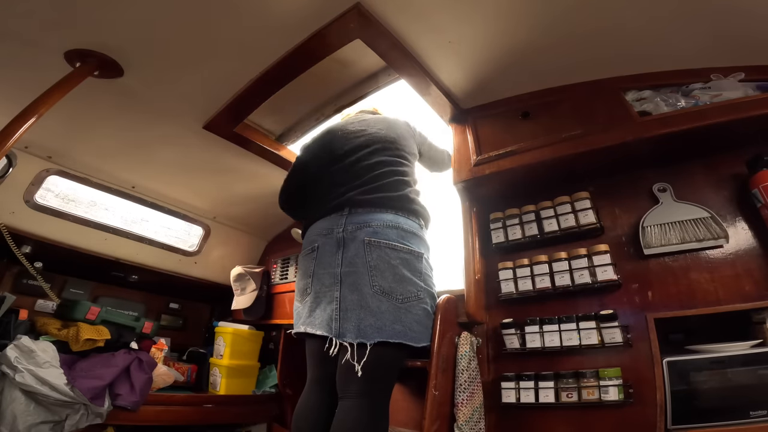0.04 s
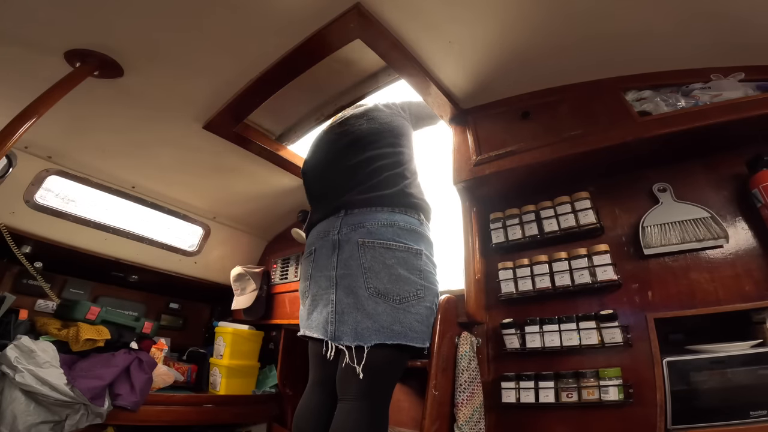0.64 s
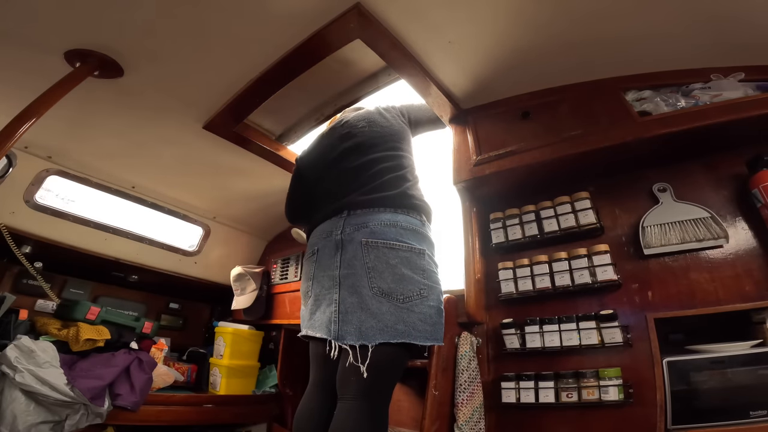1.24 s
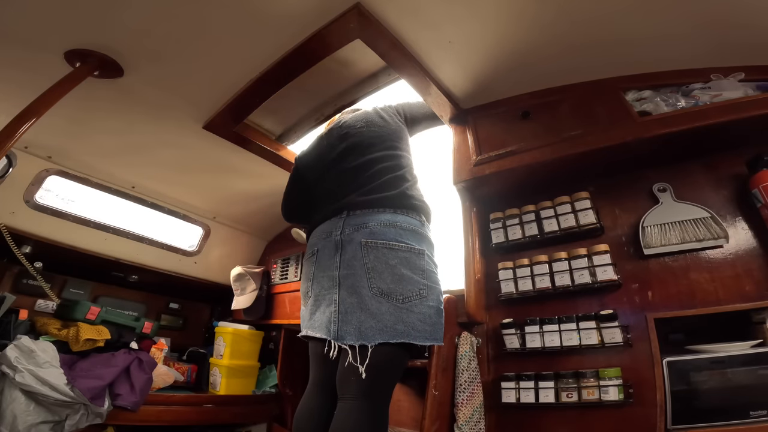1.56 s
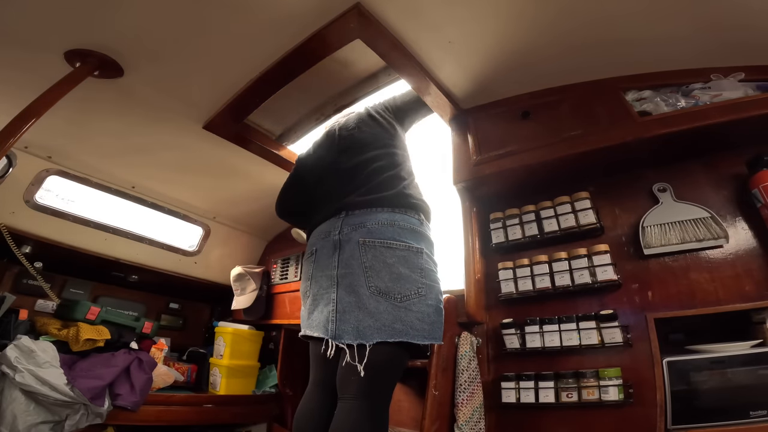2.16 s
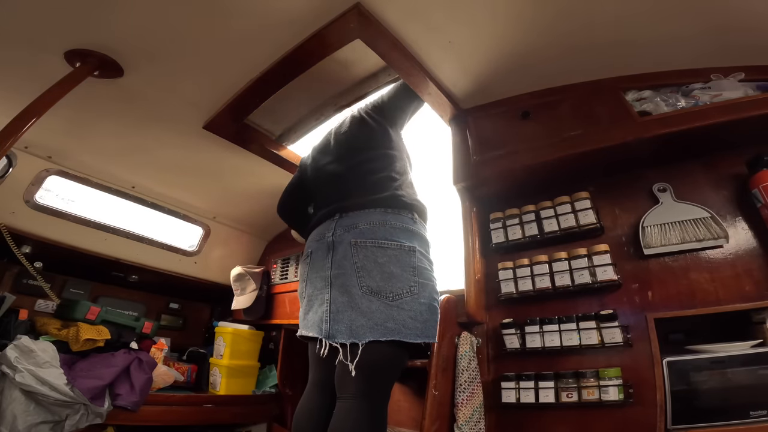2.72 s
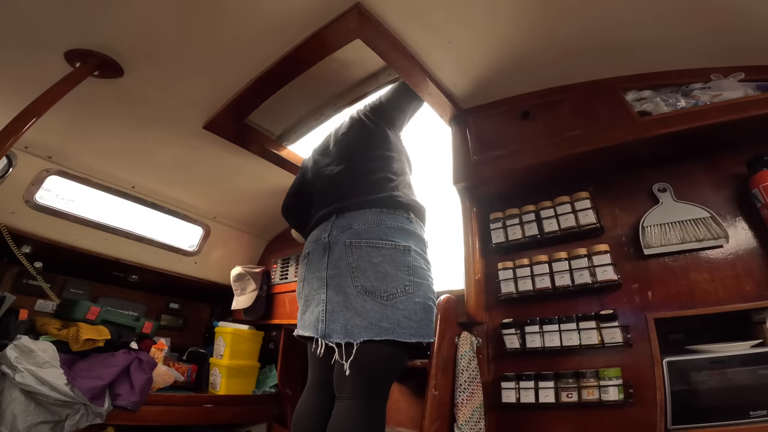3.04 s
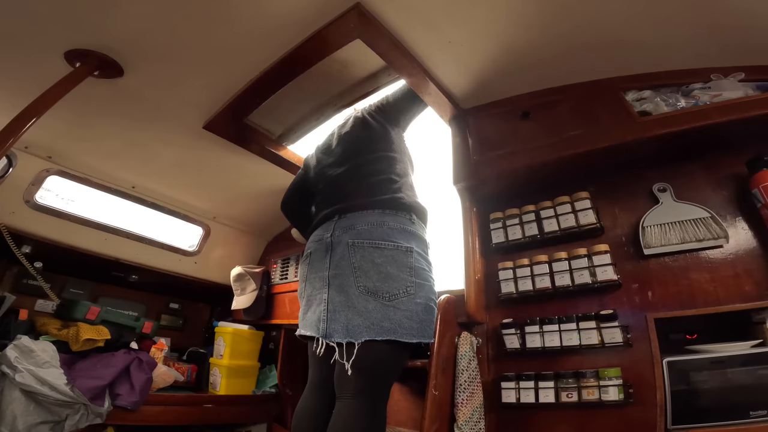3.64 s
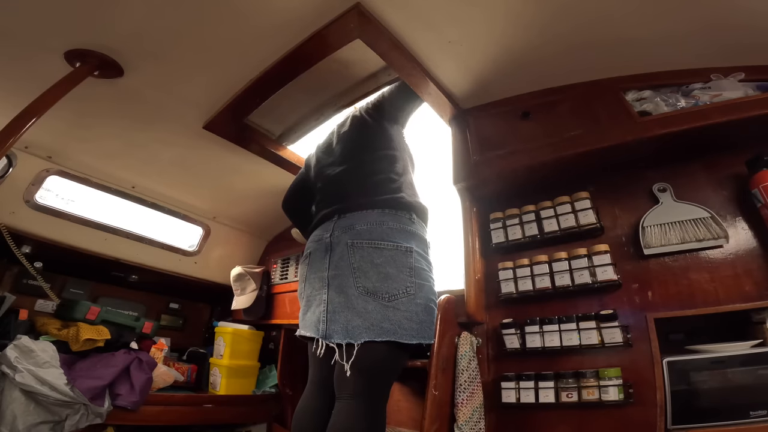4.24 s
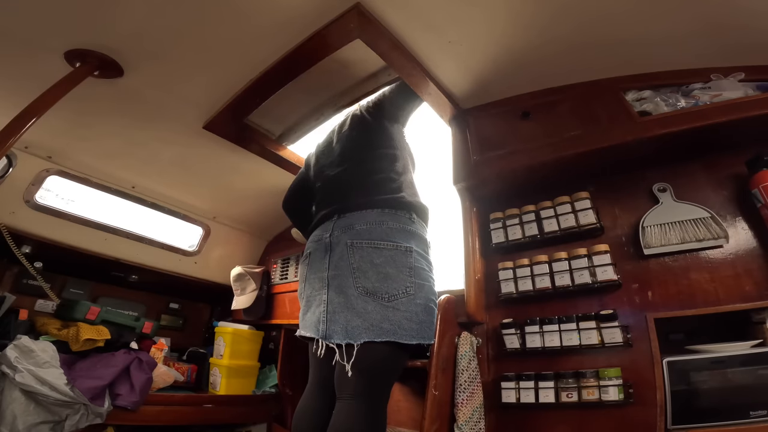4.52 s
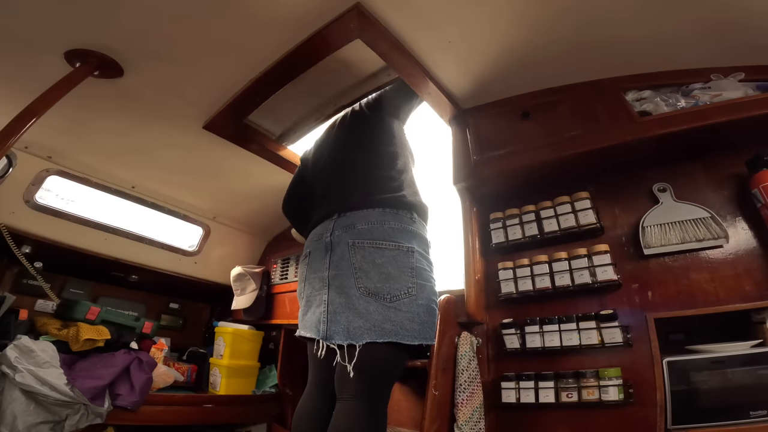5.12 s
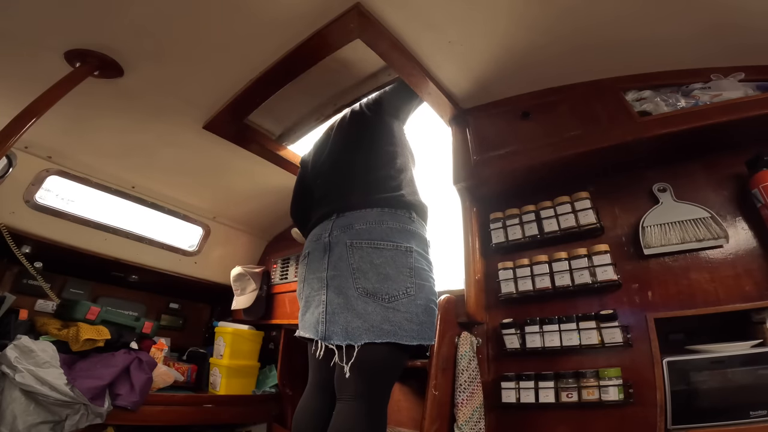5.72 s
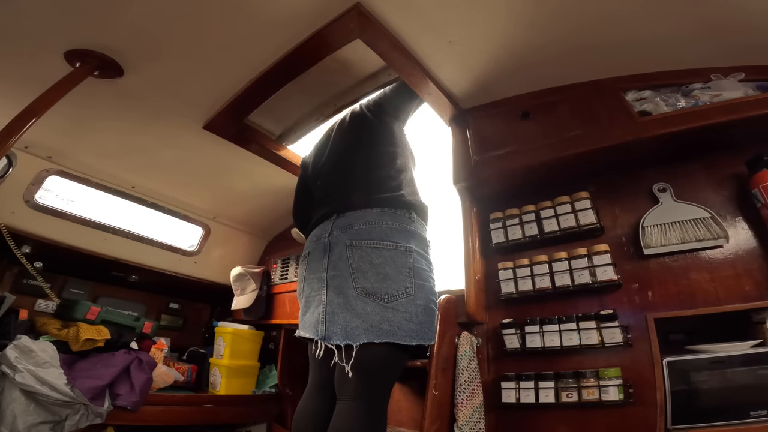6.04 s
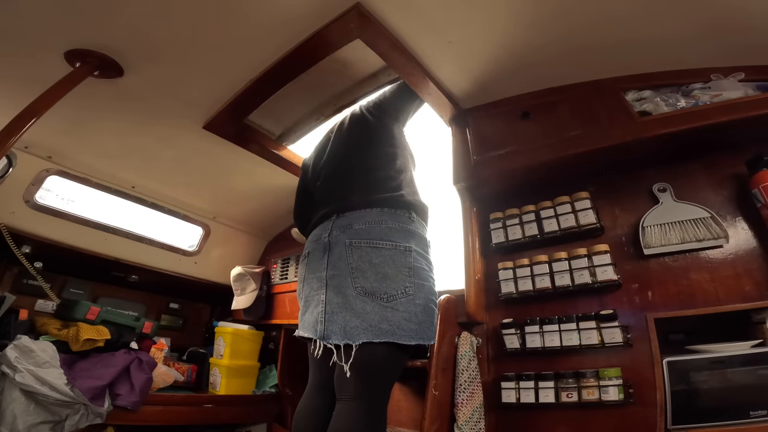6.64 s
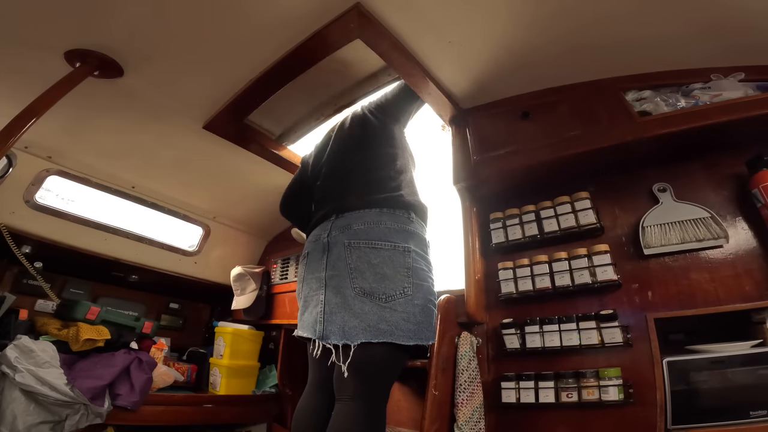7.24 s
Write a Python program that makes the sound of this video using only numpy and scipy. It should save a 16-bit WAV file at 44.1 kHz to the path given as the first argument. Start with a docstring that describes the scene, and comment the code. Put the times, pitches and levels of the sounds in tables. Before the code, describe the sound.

Hands knock, shove and scrape at a metal hatch frame in a small wooden boat cabin, with hollow clunks and rubbing.

```python
"""Someone works at the metal hatch frame of a small wooden boat, palms and sleeves swishing throughout.
An early knock booms through deck and hull; light scrapes follow, and a palm groans on the varnish.
Near three seconds the hatch is shoved three times and judders. Then come firm knocks, ticks and the
sharpest scrapes along the metal, while the hull rumbles more under the shifting weight.
A faint squeak leads into one last hard knock just before seven seconds."""
import sys
import numpy as np
from scipy import signal
from scipy.fft import rfft, irfft, next_fast_len
from scipy.io import wavfile

SR = 44100
rng = np.random.default_rng(int(sys.argv[2]) if len(sys.argv) > 2 else 0)


def waveform_to_disk(signal):
    """Save audio, clipped to [-1, 1], as 16-bit WAV at the path in sys.argv[1]."""
    frames = np.transpose(np.atleast_2d(signal))
    scaled = np.clip(frames, -1, 1) * 32767
    samples = np.round(scaled).astype(np.int16)
    wavfile.write(sys.argv[1], SR, samples)


N = 321048
TIME = np.arange(N) / SR

# rasp of the metal frame: freq_hz, level_db
RASP_SPECTRUM = [(400, -4), (900, -8.5), (1400, 5), (2000, 1.5), (2700, 2.5), (3500, 0.5), (5000, -2.5),
                 (8000, -37), (14000, -52)]
# hiss of its fine surface grain: freq_hz, level_db
GRAIN_SPECTRUM = [(1000, -26.5), (3000, 0.5), (4600, 7), (7300, 7.5), (8800, -4), (10500, -7),
                  (12500, -17.5), (15000, -31)]


def blows():
    """Hands strike the frame: single knocks, plus an uneven run of bumps for each shove of the hatch."""
    # deck thud, hull boom, panel knock and contact clack of each blow:
    # start_s, thud_db, boom_db, panel_db, clack_db, chafe_s
    hand_knocks = [(0.03, -54.5, -78, -57, -61, 0.077), (0.381, -28.5, -23, -21.5, -26.5, 0.052),
                   (0.657, -58, -59, -58, -72, 0.081), (0.866, -43, -46, -47, -48, .17),
                   (1.074, -52.5, -73, -66, -61, .1), (1.42, -51.5, -53, -49.5, -59, 0.11),
                   (1.484, -46, -28.5, -47, -56, .16), (1.832, -54, -65, -78, -41.5, 0.026),
                   (1.937, -53, -40, -46.5, -55.5, 0.46), (2.344, -36.5, -40, -33.5, -40.5, 0.15),
                   (2.571, -48.5, -43, -49, -37.5, 0.069), (2.659, -38, -42, -57, -73, .08),
                   (2.715, -29, -24.5, -44, -56, 0.046), (2.747, -28.5, -31, -31, -53.5, 0.11),
                   (2.845, -35, -25.5, -42, -56, 0.07), (3.022, -46.5, -37, -47, -64, .09),
                   (3.176, -43, -35, -48, -61, 0.19), (3.577, -31, -32, -50, -43.5, .07),
                   (3.603, -52, -28, -28, -34.5, 0.075), (3.858, -20.5, -36.5, -27.5, -39.5, 0.25),
                   (4.025, -58, -49, -47, -46.5, 0.1), (4.284, -29, -26.5, -29.5, -39.5, 0.27),
                   (4.59, -43, -55, -38, -41.5, .05), (5.065, -41, -45, -59, -50.5, 0.13),
                   (5.297, -24.5, -33, -26.5, -28.5, 0.08), (5.557, -42.5, -44.5, -38.5, -39.5, 0.07),
                   (5.713, -46, -35.5, -34.5, -35, 0.11), (5.816, -41, -34.5, -34.5, -35.5, 0.1),
                   (5.868, -30, -46.5, -36, -44.5, 0.12), (6.061, -34.5, -34.5, -25.5, -32, 0.18),
                   (6.324, -51, -60, -46.5, -57, .05), (6.442, -44.5, -37, -63, -50.5, 0.21),
                   (6.817, -23, -21.5, -21, -25, 0.042), (7.036, -41.5, -37, -46, -58.5, 0.16),
                   (7.155, -49.5, -36, -52.5, -73, .08)]
    # the hatch judders in its frame: start_s, end_s, peak_db
    shoves = [(2.756, 2.903, -36), (3.184, 3.343, -36), (3.606, 3.704, -38)]
    bumps_per_s, arch_db, chafe_s = 38, 8, 0.074
    boom_db, panel_db, clack_db = 1.5, -4.5, -14   # relative to the bump's thud
    rows = list(hand_knocks)
    for (start, end, peak_db), jitters in zip(shoves, rng.uniform(-1, 1, (len(shoves), 32))):
        for k, jitter in enumerate(jitters):
            s = start + (k + jitter * 0.25) / bumps_per_s
            if s < end:
                thud = peak_db - arch_db * (2 * (s - start) / (end - start) - 1) ** 2   # weak at the ends
                rows.append((s, thud, thud + boom_db, thud + panel_db, thud + clack_db, chafe_s))
    return np.array(rows)


def deck(hits, uneven_db, boom_db, thud_db, panel_db, frame_db):
    """Heavy blows ring the low hull modes, hard ones panels and frame; each touch favours other modes."""
    # resonances of hull, deck, panels and frame: pitch_hz, level_db, t60_s
    modes = [(49.6, -5.5, 0.85), (65.6, -4.5, 0.42), (79.7, -9.5, 0.25), (92.2, -4, 0.54),
             (121.5, -1.5, 0.3), (153.6, -3, 0.34), (175.6, -6.5, 0.49), (190.2, -4.5, 0.37),
             (216.4, -0.5, 0.24), (232, 6, 0.13), (259.8, -2.5, 0.15), (294.2, -12.5, 0.29),
             (335.2, -4.5, 0.18), (365.4, -6.5, 0.16), (380.8, -6, 0.14), (420, -11.5, 0.12),
             (503, -27.5, 0.11), (560.3, 1, 0.14), (615, -18, 0.16), (690.4, 2, 0.11), (792, -4.5, 0.11),
             (862, -28, 0.033), (1036, 3.5, 0.097), (1215, 2.5, 0.05)]
    # a hand rolls onto the frame in several touches: lag_s, share_db
    touches = [(-.002, -9), (.003, -2.5), (.012, -3.5), (.023, -7.5)]
    jitter_s, weight_lag_s = 0.003037, 0.0031   # the hand's weight lands just after the first contact
    soft_hand_hz = 2200   # a hand passes little above this to the deck
    zones_hz = [107, 210.3, 343.7, 480]   # centres of boom, thud, panel and frame
    s, thud, boom, panel, clack, _ = hits.T
    lag_s, share_db = np.transpose(touches)
    luck = rng.standard_normal((128, 2, len(modes), len(touches)))[:len(s)]
    force_db = np.array([boom + boom_db, thud + thud_db, panel + panel_db, clack + frame_db])
    out = np.zeros(N)
    for k, (hz, db, t60) in enumerate(modes):
        zone_mix = np.array([at_hz(np.c_[zones_hz, zone], hz) for zone in np.eye(len(zones_hz))])
        times = s[:, None] + weight_lag_s * zone_mix[0] + lag_s + jitter_s * np.tanh(luck[:, 0, k])
        levels_db = (zone_mix @ force_db)[:, None] + db + share_db + uneven_db * luck[:, 1, k]
        # neighbouring modes start in opposite directions, so the clunk takes a few cycles to swell
        out += (-1) ** k * ring(clicks(times, levels_db), hz, t60)
    return signal.sosfilt(signal.butter(2, soft_hand_hz, fs=SR, output="sos"), out)


def clacks(hits, swell_s):
    """No blow lands cleanly: the contact chafes on top of the clunk, duller under a heavy hand."""
    # tone of the contact: freq_hz, level_db
    clack_spectrum = [(200, -4.5), (400, 5), (540, 2), (700, -7), (1050, -9), (1450, -6.5), (2200, -17),
                      (4000, -26), (8000, -29), (14000, -50)]
    contact_hz, db_per_octave = 4530, 2.5   # the cutoff falls as the boom outweighs the clack
    out, spots = np.zeros((2, N)), cabin(clack_spectrum, count=11)
    for k, (s, _, boom_db, _, clack_db, chafe_s) in enumerate(hits):
        edge_hz = np.clip(contact_hz * 2 ** ((clack_db - boom_db) / db_per_octave), 1500, SR / 3)
        chafe = slide(swell_s, 0, chafe_s, per_s=3800)
        contact = signal.lfilter(*signal.butter(1, edge_hz, fs=SR), chafe)
        add(out, s, from_db(clack_db) * heard(contact, spots, k))
    return out


def scrapes(rasp_db, hollow_db, hiss_db):
    """Coarse slips rasp in the metal and sound hollow in the wood; fine ones hiss. Firmer is brighter."""
    # scraping strokes: start_s, level_db, hold_s, t60_s
    strokes = [(1.186, -57, .005, 0.12), (1.424, -57, .01, 0.21), (1.5, -47.5, 0.0035, 0.21),
               (1.622, -54, 0.01, 0.76), (1.757, -55.5, 0.0039, 0.046), (1.901, -51, 0.0053, 0.53),
               (3.53, -49.5, 0.015, 0.27), (3.593, -49.5, 0.0083, 0.087), (3.89, -41.5, 0.0054, 0.22),
               (3.984, -46, .005, 0.23), (4.252, -52, .005, 0.066), (4.327, -27, 0.023, 0.18),
               (4.586, -26, 0.0028, .26), (5.058, -44, 0.021, 0.13), (5.118, -46, .005, 0.12),
               (5.472, -45, 0.0027, .09), (5.556, -32, 0.031, 0.11), (5.64, -42.5, 0.016, 0.33),
               (5.857, -45.5, 0.0034, 0.099), (6.12, -39.5, 0.04, 0.11)]
    # wood behind the frame: freq_hz, level_db
    hollow_spectrum = [(150, -22.5), (400, -7.5), (700, -1), (1150, -7.5), (1600, 4), (2400, -10),
                       (6000, -71.5)]
    firm_db, firm_swell_s = -22, 0.017   # level and attack of a firm stroke
    swell_follows, hollow_follows, hiss_follows = 0.34, 0.64, 1.31   # dB for each dB of force
    out = np.zeros((2, N))
    rasp = cabin(RASP_SPECTRUM, count=7)
    wood = cabin(hollow_spectrum, count=7)
    grain = cabin(GRAIN_SPECTRUM, count=7)
    for k, (s, db, hold, t60) in enumerate(strokes):
        force_db = db - firm_db
        swell = firm_swell_s * from_db(swell_follows * force_db)
        for spot in (k, k + 1):   # touching two spots at once evens out the colour
            coarse = metal(slide(swell, hold, t60, per_s=2500))
            fine = slide(swell, hold, t60, per_s=7200)
            add(out, s, from_db(db + rasp_db) * heard(coarse, rasp, spot))
            add(out, s, from_db(hollow_db + hollow_follows * force_db) * heard(coarse, wood, spot))
            add(out, s, from_db(hiss_db + hiss_follows * force_db) * heard(fine, grain, spot))
    return out


def metal(x):
    """The frame passes the slips on and adds its own ring."""
    # ring of the scraped metal: pitch_hz, width_hz, level_db
    modes = [(1130, 118, 7.5), (1370, 13, -41), (1520, 21, -8), (1637, 16, -1), (2175, 220, -7),
             (2474, 41, -3), (3070, 33, -2), (3536, 99, 2), (3960, 19, -29), (5150, 8.4, -26),
             (5500, 60, -2)]
    return x + sum(from_db(db) * resonance(x, hz, width) for hz, width, db in modes)


def ticks(snap_db, click_db, chink_db):
    """Sharp ticks, alone or as the bright edge of a knock; some make a fitting chink."""
    # bright snap, lower click and thin chink of each contact: start_s, snap_db, click_db, chink_db
    contacts = [(0.5869, -39, -54.5, -79.5), (2.2992, -49.5, -75, -70), (2.5726, -38, -48, -45),
                (2.7973, -52, -63.5, -68), (2.845, -46.5, -56.5, -66), (3.136, -54, -69, -56),
                (3.2515, -48, -66, -70), (5.2959, -80.5, -43.5, -70), (6.0594, -54, -54, -86),
                (6.2708, -51, -57, -54), (6.459, -53, -49, -42), (6.816, -48.5, -58, -56)]
    # tone of the snap: freq_hz, level_db
    snap_spectrum = [(1000, -17), (3000, 8.5), (5000, 10.5), (8000, 10), (10000, 11.5), (13000, -27),
                     (15000, -24)]
    # thin ring of a small fitting: freq_hz, level_db
    chink_spectrum = [(5000, -9), (9000, 11), (12200, 7.5), (14500, -10)]
    out = np.zeros((2, N))
    bright = cabin(snap_spectrum, count=4)
    low = cabin(RASP_SPECTRUM, count=4)
    fitting = cabin(chink_spectrum, count=2)
    for k, (s, snap, click, chink) in enumerate(contacts):
        add(out, s, heard(from_db([snap + snap_db]), bright, k))
        add(out, s, heard(from_db([click + click_db]), low, k))
        rattle = slide(0, 0, t60=0.071, per_s=2200)
        add(out, s, from_db(chink + chink_db) * heard(rattle, fitting, k))
    return out


def frame_hiss(hiss_db, swell_s):
    """Fine hiss on the frame: light brushes, and the bright edge of the sharpest scrape."""
    # hissing strokes: start_s, level_db, hold_s, t60_s
    strokes = [(1.292, -55.5, 0.011, 0.34), (1.6, -52, 0.03, 0.16), (2.018, -51.5, 0.0075, 0.23),
               (3.21, -62.5, 0.044, .15), (4.123, -60, 0.0081, 0.073), (4.499, -57.5, .005, 0.68),
               (4.588, -35, 0.0051, 0.081), (4.76, -55, 0.0071, 0.54), (5.056, -48.5, 0.0059, 0.79),
               (5.31, -50, 0.015, 0.27), (5.428, -46.5, .003, 0.24), (5.505, -46.5, 0.055, 0.43),
               (5.665, -47.5, .05, 0.23), (5.948, -59, 0.012, 0.082), (6.193, -50, .005, 0.26),
               (6.565, -50, 0.0077, 0.33), (6.665, -52, 0.0055, 0.2), (6.77, -58, 0.074, 0.11),
               (7.012, -63, 0.0033, 0.26)]
    out, grain = np.zeros((2, N)), cabin(GRAIN_SPECTRUM, count=7)
    for k, (s, db, hold, t60) in enumerate(strokes):
        for spot in (k, k + 1):
            hiss = slide(swell_s, hold, t60, per_s=4200)
            add(out, s, from_db(db + hiss_db) * heard(hiss, grain, spot))
    return out


def groans():
    """Skin sticks and slips on varnish; each drag drives one resonance into a groan or squeak."""
    # palm drags: start_s, end_s, pitch_hz, width_hz, level_db
    drags = [(1.908, 1.98, 1630, 450, -59.5), (2.0, 2.614, 1180, 300, -63), (2.15, 2.453, 317, 65.3, -51),
             (3.482, 3.548, 1380, 438, -55), (6.26, 6.46, 1920, 315, -72), (6.745, 6.85, 1260, 251, -60.5)]
    out = np.zeros(N)
    for start, end, hz, width, db in drags:
        stick_slip = slips(N, per_s=600, spread_db=1)
        tone = resonance(resonance(stick_slip, hz, width), hz, 2 * width)
        out += from_db(db) * arch(start, end) * rms_one(tone)
    return out


def rubbing(rub_db, swish_db, uneven_db):
    """Palms rub and sleeves swish under a light, wavering pressure."""
    # dull rub of a palm: freq_hz, level_db
    palm_spectrum = [(200, 13), (450, -1.5), (800, -7.5), (1400, 3.5), (2400, -9), (4000, -21),
                     (8000, -33.5), (14000, -65.5)]
    # airy swish of cloth: freq_hz, level_db
    sleeve_spectrum = [(1500, 3), (3500, 1), (6000, 1.5), (7800, -1), (9000, -4.5), (10500, -7.5),
                       (12500, -19), (15000, -54)]
    # rise and fall of the sleeve rustle: time_s, level_db
    sleeve_levels = [(0, -66.5), (0.85, -67), (0.99, -73), (1.6, -68.5), (2.15, -68.5), (2.48, -63),
                     (2.98, -75), (3.22, -68.5), (3.42, -77), (3.62, -67.5), (4.2, -71), (4.7, -66),
                     (4.95, -77.5), (5.65, -60.5), (6.0, -73.5), (6.4, -74), (6.65, -68.5), (7.15, -80.5)]
    pressure = from_db(uneven_db * drift(rate_hz=30))
    spots = cabin(palm_spectrum, count=2)
    drive = palm_speed() * pressure
    palms = sum(heard(drive * slips(N, per_s=1500, spread_db=3.5), spots, hand) for hand in range(2))
    sleeves = envelope(sleeve_levels) * np.sqrt(pressure) * noise(sleeve_spectrum)
    return from_db(rub_db) * palms[:, :N] + from_db(swish_db) * sleeves


def palm_speed():
    """How fast the palms slide: each rub swells and fades, and they never lie quite still."""
    # light slides along the frame: start_s, end_s, level_db
    rubs = [(0.422, 0.944, -90), (1.086, 1.304, -62.5), (1.413, 2.123, -63), (2.182, 2.72, -55),
            (3.064, 3.345, -59.5), (3.52, 4.1, -60.5), (5, 5.235, -56), (5.254, 5.502, -59.5),
            (5.56, 5.794, -55.5), (5.798, 5.94, -54), (6.208, 6.385, -59), (6.44, 6.89, -66)]
    resting_db = -70.5
    arches = sum(from_db(db) * arch(start, end) for start, end, db in rubs)
    return np.hypot(arches, from_db(resting_db))


def hull(hits, grumble_db, boom_tail_db, shudder_db, thud_tail_db):
    """Shifting weight pumps the air and makes the hull grumble, palms shake the panels; blows stir both."""
    # how much the body shifts its weight: time_s, level_db
    weight_shifts = [(0, -75), (0.28, -70), (0.46, -43), (1.2, -75), (1.62, -55), (2.25, -60), (2.8, -46),
                     (3.3, -43.5), (3.9, -43), (4.4, -37), (4.9, -48.5), (5.3, -46.5), (5.65, -36.5),
                     (6.4, -33.5), (6.75, -53.5), (7.0, -39), (7.28, -32)]
    # slow pumping of the cabin air: freq_hz, level_db
    sway_spectrum = [(2, -12), (6, 12), (11, 1.5), (18, 1.5), (30, -29.5), (70, -88), (400, -120)]
    # deep rumble of the hull: freq_hz, level_db
    rumble_spectrum = [(12, -1.5), (25, -8.5), (36, -3.5), (48, -2), (62, -20.5), (92, -16), (140, -21),
                       (400, -40.5), (2000, -100)]
    # shudder of the panels: freq_hz, level_db
    shudder_spectrum = [(60, -48.5), (115, -22.5), (165, -1), (205, 1.5), (250, -4), (300, -9.5),
                        (370, -10.5), (480, -34), (1000, -52.5), (5000, -60)]
    grumble_follows, shudder_follows = 0.67, .55   # dB for each dB of shifting, of palm speed
    grumble_hz = 55   # slow shifting only reaches the lowest notes
    s, thud, boom = hits.T[:3]
    shifting = envelope(weight_shifts)
    sway = shifting * rms_one(colour(rng.standard_normal(N), sway_spectrum))
    rumble = noise(rumble_spectrum)
    lowest = signal.sosfilt(signal.butter(3, grumble_hz, fs=SR, output="sos"), rumble)
    grumble = from_db(grumble_db) * shifting ** grumble_follows * lowest
    boom_tail = settling(s, boom + boom_tail_db) * rumble
    palm_shake = from_db(shudder_db) * palm_speed() ** shudder_follows
    shudder = np.hypot(palm_shake, settling(s, thud + thud_tail_db)) * noise(shudder_spectrum)
    return sway + grumble + boom_tail + shudder


def settling(times, levels_db, rise_s=0.02, t60_s=0.82):
    """How much the boat is still moving from the blows so far; their energies add."""
    t = TIME[:SR]
    shape = (1 - np.exp(-t / rise_s)) * from_db(-60 * t / t60_s)
    return np.sqrt(abs(signal.fftconvolve(clicks(times, levels_db) ** 2, shape ** 2)[:N]))


def cabin(spectrum, count):
    """Responses from spots on the frame: a first arrival, then reflections that die sooner in the treble."""
    # decay of the cabin: freq_hz, t60_s
    decays = [(300, 0.21), (2000, 0.1656), (11000, 0.01)]
    first_db, first_s = 6.5, 0.0013   # first arrival: level over the reflections, decay time
    size = 2 ** 13
    t, hz = TIME[:size], np.fft.rfftfreq(size, 1 / SR)
    first_arrival = from_db(first_db) * np.exp(-t / first_s)
    fields = rfft(np.array([diffuse(size) for spot in range(count)]))
    centres, t60s = np.transpose(decays)
    echoes = 0
    for share, t60 in zip(np.eye(len(centres)), t60s):
        band = irfft(fields * at_hz(np.c_[centres, share], hz))
        echoes = echoes + band * (from_db(-60 * t / t60) + first_arrival)
    responses = irfft(rfft(echoes) * causal_filter(spectrum, size))
    return [rms_one(spot) / np.sqrt(size) for spot in responses]


def diffuse(size):
    """Noise arriving from all round: alike left and right in the bass, wider in the treble."""
    # stereo width: freq_hz, side_over_mid_db
    width = [(100, -21.5), (200, -10.5), (350, -6.5), (700, -5.5), (1400, -6.5), (2800, -4), (6000, -7.5),
             (13000, -5.5)]
    # stereo balance: freq_hz, left_minus_right_db
    balance = [(300, -2), (700, -1.5), (1400, 1.3), (2800, 1.5), (5600, 0.4), (10000, 1), (13000, 13)]
    mid, side = rng.standard_normal((2, size))
    side = colour(side, width)
    return np.array([colour(mid + sign * side, np.array(balance) * [1, sign / 2]) for sign in (1, -1)])


def heard(x, spots, k):
    """Contact number k on its way through the cabin; the spots take turns."""
    return signal.fftconvolve(x[None], spots[k % len(spots)], axes=1)


def slide(swell, hold, t60, per_s):
    """Slips under a movement that swells, holds and runs out; times in seconds."""
    t = TIME[:SR // 2]
    attack = np.minimum(t / max(swell, .001), 1)
    release = from_db(-60 * np.maximum(t - swell - hold, 0) / max(t60, .01))
    return attack * release * slips(len(t), per_s, spread_db=3.0)


def slips(size, per_s, spread_db):
    """Tiny catches of uneven size between two surfaces; rms 1."""
    sizes = from_db(spread_db * np.minimum(rng.exponential(1, size), 4))
    signs = rng.choice([-1, 1], size)
    return rms_one(sizes * signs * (rng.random(size) < per_s / SR))


def ring(x, hz, t60):
    """A unit click sets a sine of height 1 ringing."""
    r, w = from_db(-60 / (t60 * SR)), 2 * np.pi * hz / SR
    return signal.lfilter([0, np.sin(w)], [1, -2 * r * np.cos(w), r * r], x + 1e-18)


def resonance(x, hz, width):
    """Band-pass with gain 1 at its peak."""
    r, w = np.exp(-np.pi * width / SR), 2 * np.pi * hz / SR
    return signal.lfilter(np.array([1, 0, -1]) * (1 - r * r) / 2, [1, -2 * r * np.cos(w), r * r], x)


def clicks(times, levels_db):
    """One impulse for each contact."""
    out = np.zeros(N)
    out[np.clip(np.round(times * SR).astype(int), 0, N - 1)] = from_db(levels_db)
    return out


def noise(spectrum):
    """Steady stereo noise, rms 1."""
    return rms_one(colour(diffuse(N), spectrum))


def colour(x, spectrum):
    """Give a steady signal a spectrum."""
    size = x.shape[-1]
    padded = next_fast_len(size)
    gain = from_db(at_hz(spectrum, np.fft.rfftfreq(padded, 1 / SR)))
    return irfft(rfft(x, padded) * gain, padded)[..., :size]


def causal_filter(spectrum, size):
    """Frequency response that has this spectrum and no pre-ring."""
    log_gain = np.log(from_db(at_hz(spectrum, abs(np.fft.fftfreq(size, 1 / SR)))))
    return np.exp(np.conj(signal.hilbert(log_gain)))[:size // 2 + 1]


def at_hz(points, hz):
    """Read a table on a log-frequency axis."""
    at, values = np.transpose(points)
    return np.interp(np.log(np.maximum(hz, 1)), np.log(at), values)


def envelope(points):
    """Gain curve through points of time_s, level_db."""
    return from_db(np.interp(TIME, *np.transpose(points)))


def arch(start, end):
    """A half-sine swell and fade."""
    return np.sin(np.pi * np.clip((TIME - start) / (end - start), 0, 1))


def drift(rate_hz):
    """A random wander around zero."""
    knots = rng.standard_normal(N // 40)
    return np.interp(TIME * rate_hz, np.arange(len(knots)), knots)


def add(out, s, sound):
    """Mix a sound in at time s."""
    start = int(s * SR)
    out[:, start:start + sound.shape[1]] += sound[:, :N - start]


def from_db(db):
    return 10 ** (np.asarray(db) / 20)


def rms_one(x):
    return x / np.sqrt(np.mean(x ** 2) + 1e-20)


def scene():
    """Mix the friction on the frame, the boom of the boat and the hard contacts."""
    hits = blows()
    friction = scrapes(rasp_db=-11.5, hollow_db=-41.0, hiss_db=-39.5)
    friction += frame_hiss(hiss_db=-9.0, swell_s=0.0058)
    friction += rubbing(rub_db=-1.5, swish_db=0.5, uneven_db=5.0) + groans()
    boat = hull(hits, grumble_db=-22, boom_tail_db=-9, shudder_db=-27, thud_tail_db=-19)
    boat += deck(hits, uneven_db=1.5, boom_db=-2.5, thud_db=-2.5, panel_db=1.5, frame_db=-14)
    contacts = ticks(snap_db=12.5, click_db=25.0, chink_db=-8.5) + clacks(hits, swell_s=0.0028)
    return friction + boat + contacts


def record(dry):
    """A steep low-pass takes off the very top."""
    cutoff_hz = 14800
    return signal.sosfilt(signal.ellip(10, .1, 80, cutoff_hz, fs=SR, output="sos"), dry)


dry = scene()
out = record(dry)
waveform_to_disk(out)
```